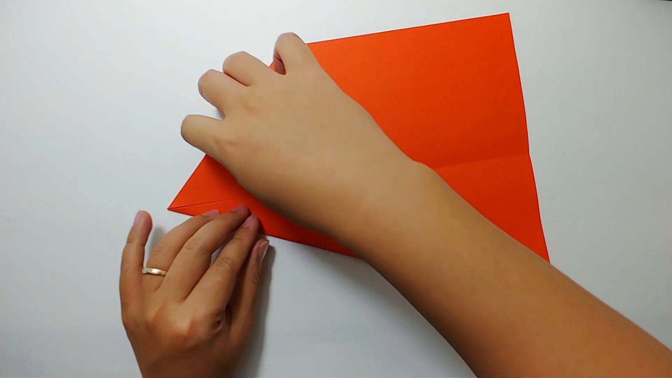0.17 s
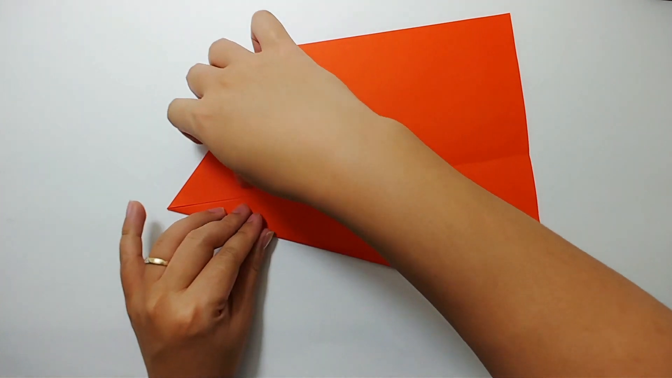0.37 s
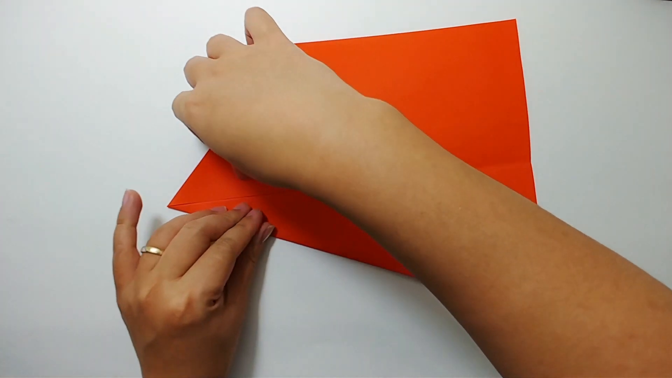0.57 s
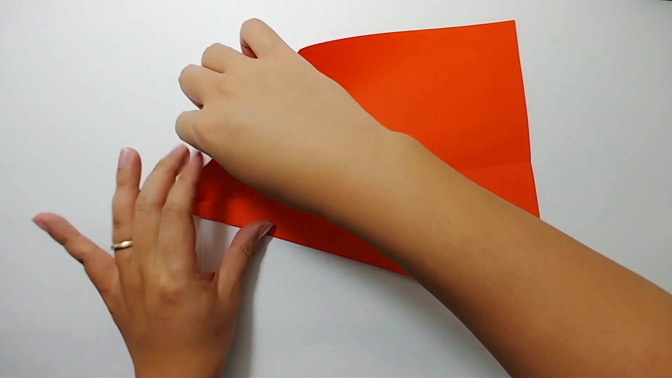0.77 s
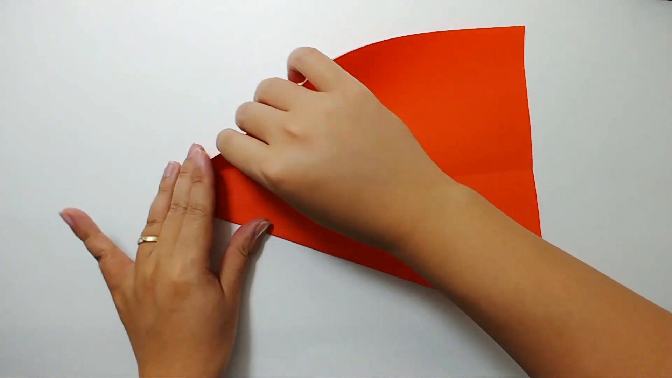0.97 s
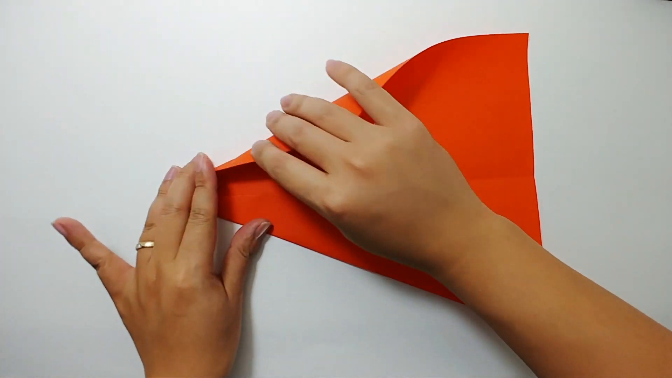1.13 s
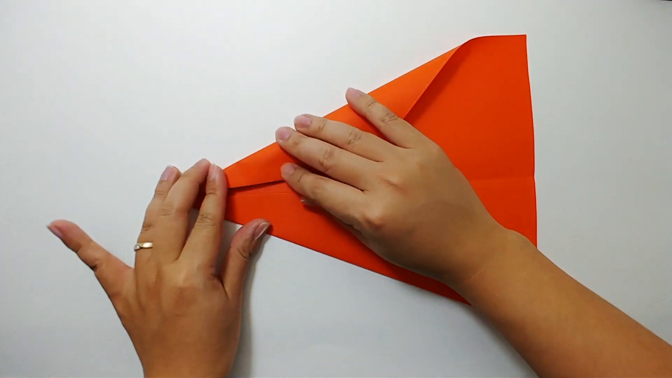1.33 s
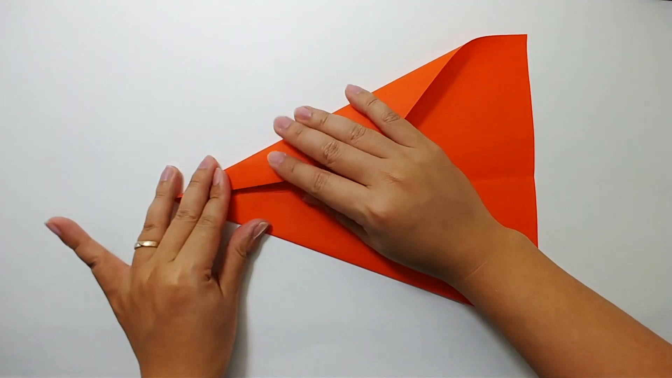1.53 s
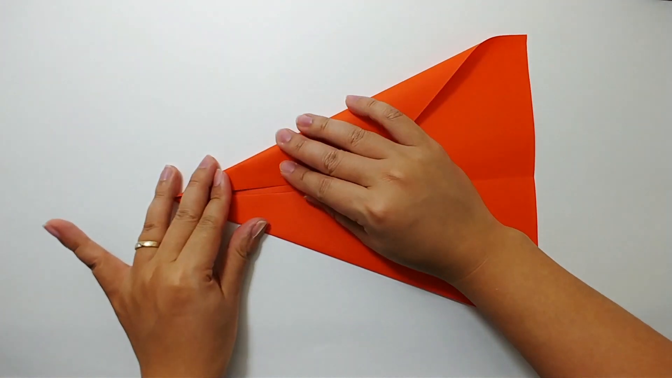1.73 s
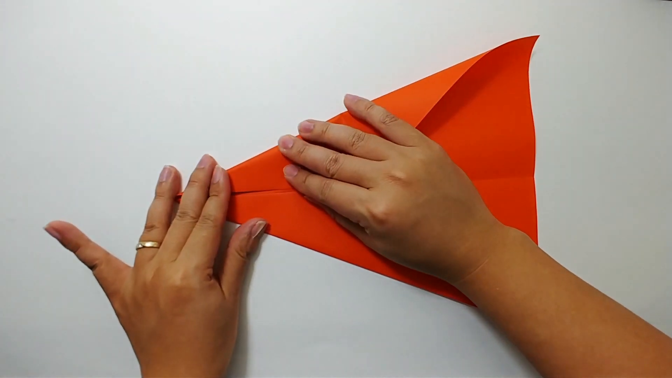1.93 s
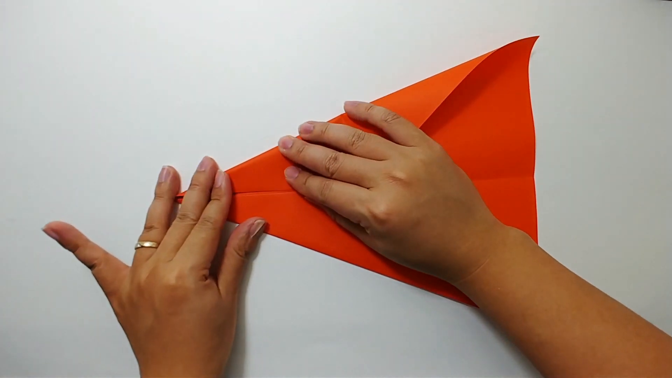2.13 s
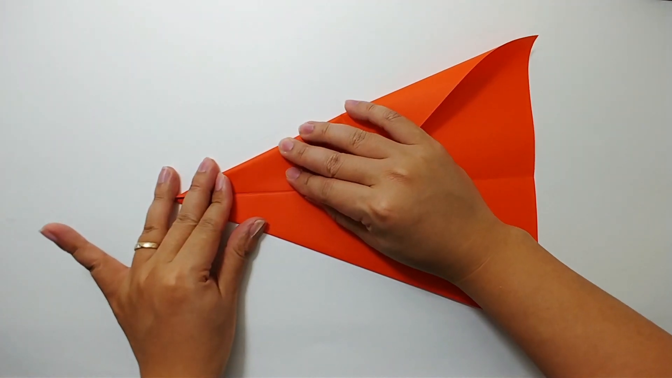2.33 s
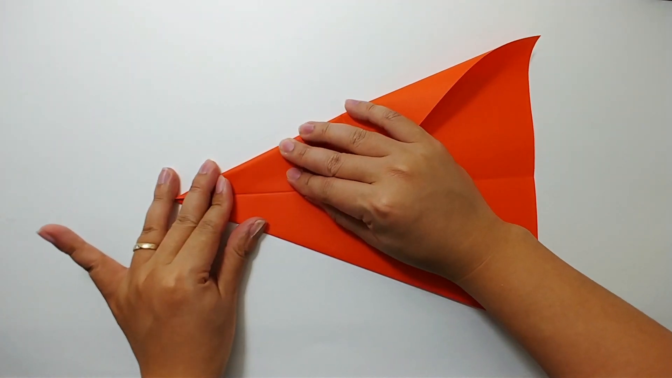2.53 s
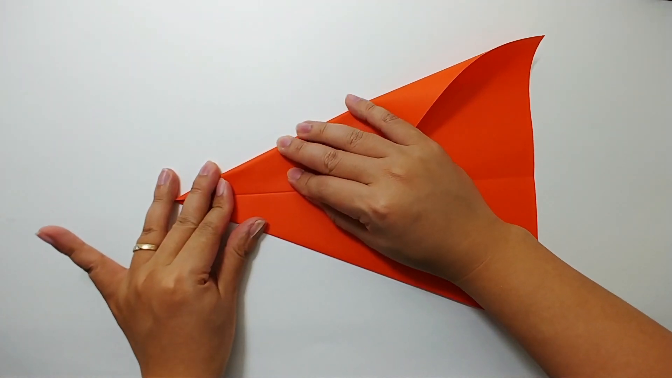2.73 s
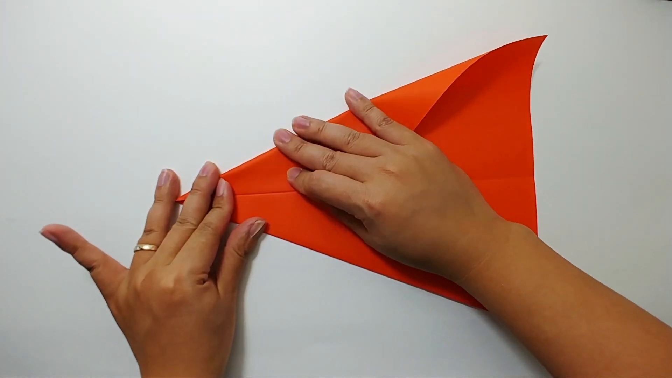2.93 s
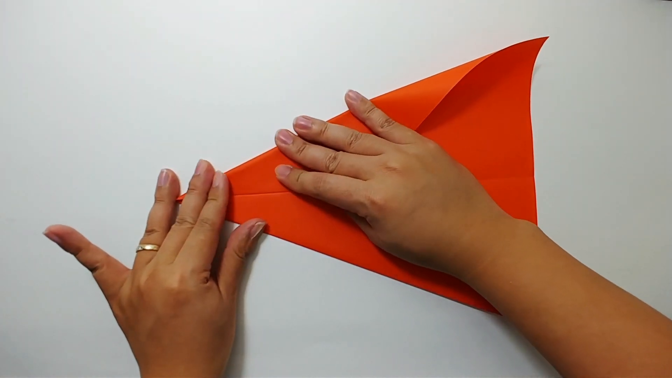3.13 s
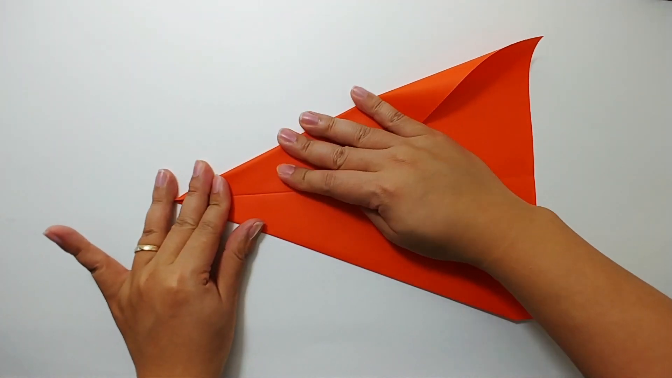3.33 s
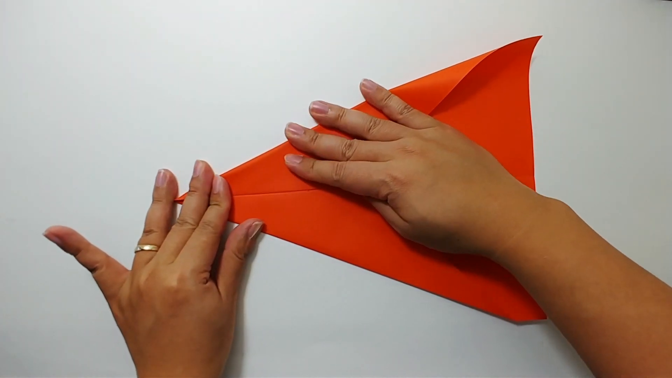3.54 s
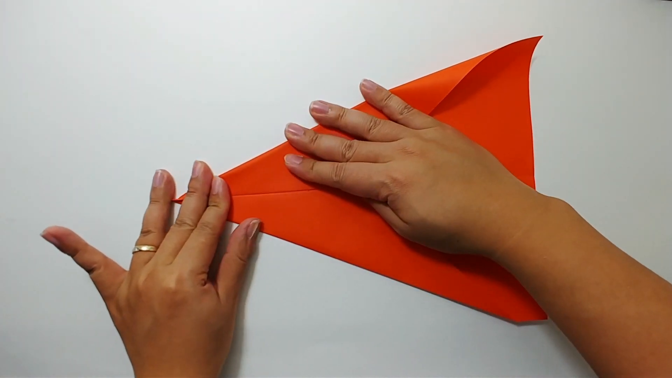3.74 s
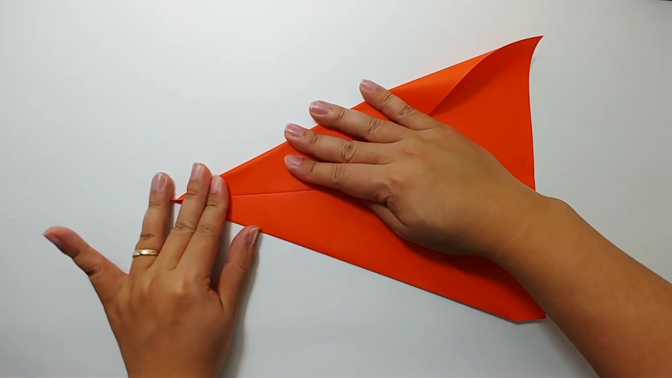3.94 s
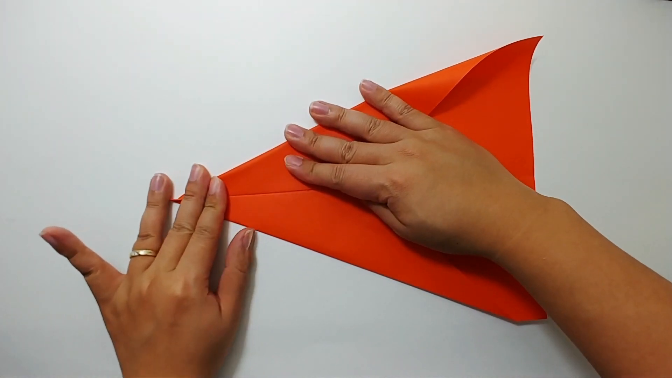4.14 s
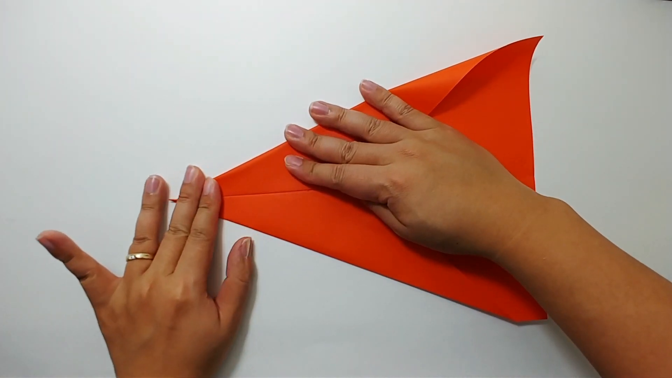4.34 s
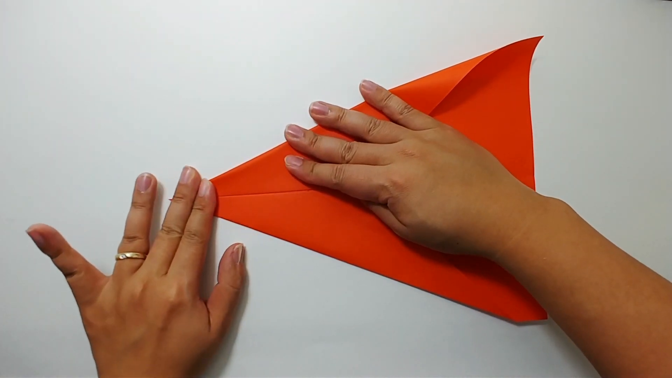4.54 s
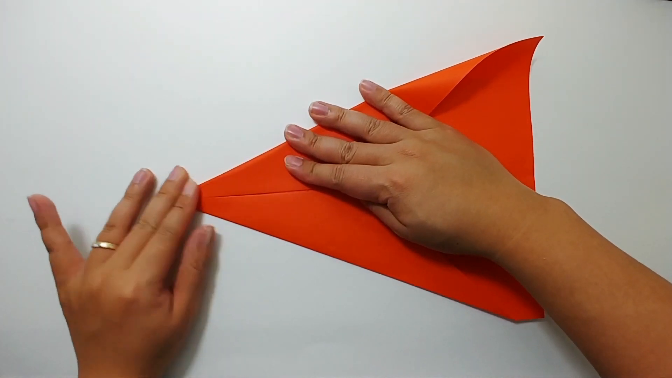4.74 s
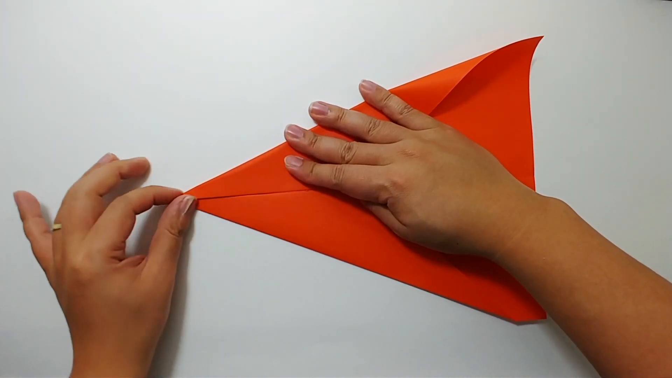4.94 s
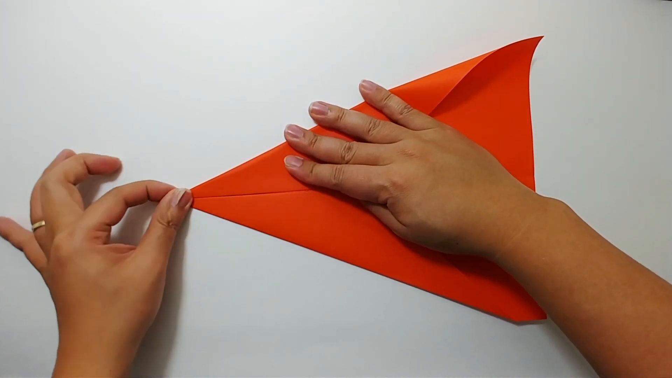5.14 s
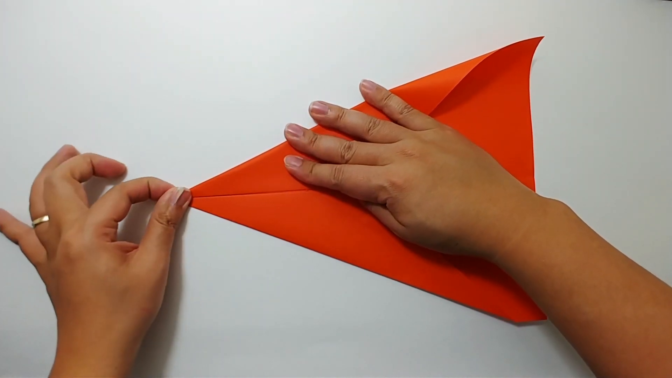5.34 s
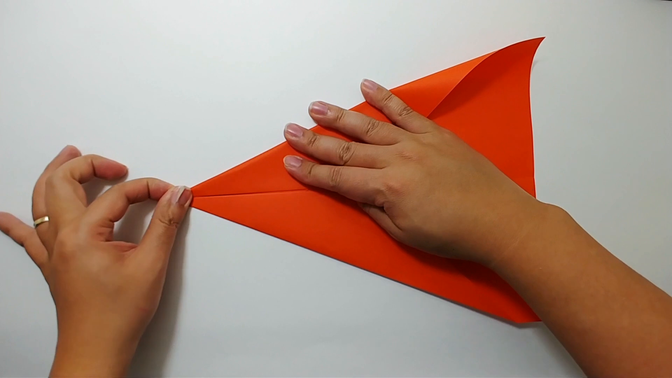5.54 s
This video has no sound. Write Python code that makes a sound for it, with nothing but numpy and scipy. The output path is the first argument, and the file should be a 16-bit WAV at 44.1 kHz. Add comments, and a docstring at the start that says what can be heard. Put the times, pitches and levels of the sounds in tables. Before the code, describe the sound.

Over a steady faint low rumble, paper ticks sharply and slides over itself with a bright swish whose hollow hum drops in pitch. A brief resonant pop follows, then scattered crackles, dry fingertip strokes and dull table bumps. The end is quieter, apart from a short strong stroke and a snap. Close stereo microphone, small dry room.

```python
"""Two hands fold a sheet of paper on a table in a small quiet room, close to a stereo microphone.
Over a steady low rumble, first crinkles, finger strokes and hand bumps lead to sharp ticks of the buckling sheet.
Just before 1 s the flap starts to slide over (filtered noise); the hum of its air pocket drops as it closes.
At 2 s the flap pops (fading sine waves); small crinkles (bursts of clicks) and strokes along the crease follow.
From 3.9 s light finger skids and mostly faint strokes remain, with one strong stroke near 4.9 s and one more
loud crinkle just before 5 s."""
import sys
import numpy as np
from scipy import signal
from scipy.fft import rfft, irfft, next_fast_len
from scipy.io import wavfile
from scipy.ndimage import uniform_filter1d

SR = 44100
rng = np.random.default_rng(int(sys.argv[2]) if len(sys.argv) > 2 else 0)


def to_wav(sig):
    """Store sig (one row per channel, or 1-D mono) as 16-bit WAV at the path in sys.argv[1].

    Samples outside -1..1 are clipped; the rate is SR.
    """
    pcm = np.clip(np.atleast_2d(sig), -1, 1) * 32767
    pcm = np.round(pcm).astype(np.int16)
    wavfile.write(sys.argv[1], SR, pcm.T)  # frames by channels


N = 251229
TIME = np.arange(N) / SR  # s


def undb(db):
    """Turn decibels into a gain."""
    return 10 ** (np.asarray(db) / 20)


def unit(x):
    """Scale to rms 1."""
    return x / np.sqrt(np.mean(x ** 2) + 1e-20)


def colour(x, points, bumps=()):
    """Filter that never sounds early, from (f/Hz, level/dB) points and (f/Hz, width/Hz, lift/dB) resonances."""
    n = 2 * next_fast_len(x.shape[-1] // 2 + 1)
    f = np.arange(n // 2 + 1) * SR / n
    hz, db = np.transpose(points)
    curve_db = np.interp(np.log(f + 1), np.log(hz), db)
    for centre, width, lift in bumps:
        curve_db = curve_db + lift / (1 + (2 * (f - centre) / width) ** 2)
    # folding the cepstrum onto positive times gives the minimum-phase filter
    cepstrum = irfft(np.log(undb(curve_db)))
    cepstrum[1:n // 2] *= 2
    cepstrum[n // 2 + 1:] = 0
    response = np.exp(rfft(cepstrum))
    return irfft(rfft(x, n) * response)[..., :x.shape[-1]]


# the four parts of paper sound; the upper edges of the first three split them: (lower f/Hz, upper f/Hz)
PART_EDGES = [(250, 850), (850, 2000), (2000, 6000), (6300, 11500)]


def bands(x):
    """Split into low scrape, sheet flexing, main rustle and fibre hiss, each at rms 1."""
    n = next_fast_len(x.shape[-1])
    spectrum, f = rfft(x, n), np.arange(n // 2 + 1) * SR / n
    lowpasses = [1 / (1 + (f / upper) ** (10 + upper / 300)) for _, upper in PART_EDGES[:-1]]
    below = [0] + lowpasses + [1]
    parts = [irfft(spectrum * (b - a), n) for a, b in zip(below, below[1:])]
    return [unit(part[..., :x.shape[-1]]) for part in parts]


def stereo(x, left_db):
    """Lean the sound to one side; left_db is how much louder the left gets than the right."""
    return x * undb(np.array([[left_db], [-left_db]]) / 2)


def port_noise(apart_db):
    """Noise that both microphone ports share, with a part that differs between them."""
    mid, side = rng.standard_normal((2, N))
    return mid + undb(apart_db) * side * np.array([[1], [-1]])


def walk(rate):
    """Smooth random wander with spread 1, taking `rate` new values per second."""
    step = int(SR / rate)
    values = np.repeat(rng.standard_normal(N // step + 1), step)[:N]
    return unit(uniform_filter1d(values, step))


def slips(rate, scatter_db, size):
    """Random catches of the paper fibres, `rate` per second: many small ones and a few large."""
    caught = rng.random(size) < rate / SR
    sign = rng.choice([-1, 1], size)
    return caught * sign * undb(scatter_db * np.minimum(rng.exponential(1, size), 4))


def spread(near_t60, direct_db, room_t60=0.12, room_db=-11, lag_size=5, size=8192):
    """How a slip at one spot reaches both ports: direct tick, flutter between sheet and table, short room tail."""
    t = TIME[:size]
    mid, side = rng.standard_normal((2, size))
    paths = mid + colour(side, [(150, -7.5), (1200, 0.5), (2500, 1.0)]) * np.array([[1], [-1]])
    decay = unit(undb(-60 * t / near_t60)) + undb(room_db) * unit(undb(-60 * t / room_t60))
    direct = np.zeros((2, size))
    direct[0, 0] = direct[1, lag_size] = 1  # the left port is a little nearer
    spectrum = rfft(unit(paths * decay) + undb(direct_db) * unit(direct))
    # the paths leave fine ripples only; the broad colour belongs to the paper
    broad = np.sqrt(uniform_filter1d(np.mean(abs(spectrum) ** 2, axis=0), size=100))
    return irfft(spectrum / broad)[:, :size * 3 // 4]


def resonance(hz, width_hz, apart_db):
    """A gliding resonance stirred by friction noise, at rms 1."""
    stir = port_noise(apart_db) + 1j * port_noise(apart_db)
    swell = signal.sosfilt(signal.butter(2, width_hz / 2, fs=SR, output="sos"), stir)
    return unit(np.real(swell * np.exp(2j * np.pi * np.cumsum(hz) / SR)))


def gestures(rows, skew, power, linger_db=-14, linger_s=0.062):
    """Loudness of (start t/s, length t/s, level/dB) movements that speed up and slow down.
    Light contact lingers just before and after. Skew over 1 peaks late; low power is flat-topped."""
    energy = np.zeros(N)
    for start, length, db in rows:
        on = (TIME > start) & (TIME < start + length)
        speed = np.sin(np.pi * ((TIME[on] - start) / length) ** skew)
        energy[on] += (undb(db) * abs(speed) ** power) ** 2
    span = int(linger_s * SR) + 1
    contact = abs(uniform_filter1d(uniform_filter1d(energy, span), span))
    return np.sqrt(energy + undb(linger_db) ** 2 * contact)


def held(starts, values):
    """Each movement keeps its own value until the next one starts."""
    return values[np.maximum(np.searchsorted(starts, TIME) - 1, 0)]


# colour of the room rumble and hiss: (f/Hz, relative level/dB per Hz)
ROOM_COLOUR = [(20, -10.5), (40, -9.5), (65, 1), (100, -3), (135, 0), (190, -15.5), (270, -31.5),
               (380, -15.5), (600, -21.5), (1000, -24.5), (2000, -32.5), (5300, -43), (6400, -51.5),
               (11500, -51)]
# faint resonances in the room noise: (f/Hz, width/Hz, lift/dB)
ROOM_RESONANCES = [(109, 16, 3.5), (373, 22, 6), (600, 36, 7.5), (834, 30, 11), (970, 36, 6.5)]
ROOM_DB = -57


def room():
    """Steady rumble, more alike at both ports in the bass and diffuse higher up."""
    mid, side = rng.standard_normal((2, N))
    side = colour(side, [(30, -3.5), (100, -8), (400, -7.5), (2000, 1)])
    noise = colour(mid + side * np.array([[1], [-1]]), ROOM_COLOUR, ROOM_RESONANCES)
    return stereo(unit(noise) * undb(ROOM_DB), left_db=0.0)


# low tones at which the tabletop rings: (f/Hz, width/Hz, relative level/dB)
TABLE_MODES = [(74.5, 6.1, 8), (121.2, 11, 8.5), (134.8, 8.3, -1.5), (180, 10, -34)]
# a hand leans its weight on the table: (start t/s, length t/s, level/dB)
HAND_LEANS = [(.72, 0.15, -49), (.96, 0.11, -54), (1.47, 0.29, -48.5), (2.47, .22, -52), (3.22, .12, -49),
              (5.49, 0.2, -49.5)]
# table tremor of resting hands (dB) and of a finger stroke (dB re the stroke)
REST_TREMOR_DB, STROKE_TREMOR_DB = -62, -5


def tabletop(effort, wander_db=2, lean_power=0.47):
    """Tremors of resting, leaning and stroking hands ring the table's low modes."""
    rest = undb(REST_TREMOR_DB + wander_db * walk(rate=5.4))
    lean = gestures(HAND_LEANS, 0.83, lean_power)
    stroke = undb(STROKE_TREMOR_DB) * effort
    force = np.sqrt(rest ** 2 + lean ** 2 + stroke ** 2)
    low_band = signal.butter(2, [45, 240], "band", fs=SR, output="sos")
    tremor = signal.sosfilt(low_band, port_noise(apart_db=-6))
    ring = 0
    for hz, width, db in TABLE_MODES:
        ring = ring + undb(db) * signal.lfilter(*signal.iirpeak(hz, hz / width, fs=SR), tremor)
    return stereo(unit(ring) * force, left_db=-2.5)


# a hand lands or shifts on the table: (t/s, peak level/dB before the lean to one side, starting f/Hz, rise t/s)
HAND_THUMPS = [(0.328, -38.5, 208, 0.0018), (.331, -27, 102.4, .007), (0.74, -42, 136, 0.0057),
               (1.491, -40, 73.5, 0.013), (1.56, -39, 127, 0.0045), (2.021, -38, 161, 0.002),
               (2.774, -44, 79, 0.01), (2.908, -45.5, 85, 0.014), (3.577, -40, 126, 0.012),
               (3.776, -35, 95.4, 0.007), (3.969, -38.5, 112.5, 0.0087), (4.002, -37.5, 108, .006),
               (4.448, -33, 136, 0.0043), (5.351, -41, 108.3, 0.012)]


def thumps(sag=0.18, sag_s=0.056, size=8192):
    """A soft push bends the table for a few cycles; the pitch sags as the hand settles."""
    out, t = np.zeros(N + size), TIME[:size]
    for s, db, hz, rise in HAND_THUMPS:
        pitch = hz * (1 - sag * (1 - np.exp(-t / sag_s)))
        phase = np.cumsum(pitch) / SR
        swell = t / rise * np.exp(1 - t / rise)
        start = int(s * SR)
        out[start:start + size] += undb(db) * swell * np.sin(2 * np.pi * phase)
    return stereo(out[:N], left_db=-6)


# colour of the rubbed sheet, also used for the crinkles: (f/Hz, level/dB)
PAPER_COLOUR = [(100, -35.5), (250, -11.5), (400, -0.5), (800, -3.5), (1100, -4), (1400, -4.5), (2600, -1),
                (4100, 0), (5400, 0.5), (5900, -7), (6450, -17), (8000, -12), (9700, -19.5), (12000, -35.5)]
# resonances of the sheet on the table: (f/Hz, width/Hz, lift/dB)
SHEET_RESONANCES = [(1349, 200, 10), (1930, 110, 7.5), (2656, 720, 3.5), (3700, 210, 8), (4535, 420, 3),
                    (5300, 260, 4.5)]


def friction(wander_db=1.5, grip_db=1.0, count=2):
    """Dense stick-slip catches drive the sheet at fingertips whose shares wander; gives four parts and the grip."""
    grip, sound = undb(grip_db * walk(rate=110)), 0
    for _ in range(count):
        share = undb(wander_db * walk(rate=7.6))
        drive = slips(rate=3000, scatter_db=3.5, size=N) * grip * share
        sound = sound + signal.fftconvolve(drive[None], spread(near_t60=0.049, direct_db=-15.5))[:, :N]
    # the fingertips share one total force, so the level is evened out
    sound = sound / np.sqrt(uniform_filter1d(np.mean(sound ** 2, axis=0), size=2200) + 1e-12)
    scrape, flex, rustle, hiss = bands(colour(sound, PAPER_COLOUR, SHEET_RESONANCES))
    return scrape, flex, rustle, hiss, grip


REST_RUB_DB = -82.5  # level of the rustle before its wander


def resting_hands(rub, wander_db=3, flex_db=-3, hiss_db=-10):
    """The hands that hold the sheet down never keep quite still and rub it very faintly."""
    _, flex, rustle, hiss, _ = rub
    level = undb(REST_RUB_DB + wander_db * walk(rate=6))
    return level * (undb(flex_db) * flex + rustle + undb(hiss_db) * hiss)


# dry fingertips skid lightly over the sheet: (start t/s, length t/s, level/dB before the mix, swish f/Hz)
FINGER_SKIDS = [(.34, 0.18, -67, 5300), (0.421, .05, -56.5, 5250), (.485, 0.14, -58, 4440),
                (3.852, 0.04, -60, 4780), (3.953, 0.22, -64.5, 4960), (4.441, 0.13, -54, 4740),
                (4.923, .15, -51.5, 5240), (5.107, 0.05, -66, 3190), (5.143, 0.063, -56.5, 5170),
                (5.231, 0.042, -57.5, 4270)]


def finger_skids(rub, skew=0.6, power=0.54, rustle_db=-3.5, swish_db=-3.0, flex_db=-17, hiss_db=-19):
    """A light touch starts quickly and trails off in a bright, narrow swish."""
    _, flex, rustle, hiss, grip = rub
    start, length, db, hz = np.transpose(FINGER_SKIDS)
    swish = grip * resonance(held(start, hz), width_hz=550, apart_db=-1.5)
    paper = undb(flex_db) * flex + undb(rustle_db) * rustle + undb(swish_db) * swish + undb(hiss_db) * hiss
    return stereo(gestures(zip(start, length, db), skew, power) * paper, left_db=1.2)


# the flap slides over the sheet in pushes:
# (start t/s, length t/s, level/dB, flexing level/dB re level, air pocket level/dB re level)
FLAP_PUSHES = [(0.898, 0.14, -38, -17, -11.5), (1.019, 0.14, -38, -16.5, -8.5),
               (1.085, .16, -38.5, -15.5, -10.5), (1.152, 0.29, -40.5, -12, -12),
               (1.418, 0.17, -48, -2.5, -5.5), (1.6, 0.086, -44.5, -2, -20), (1.728, 0.066, -53.5, 6, -14),
               (1.782, 0.064, -51, 6, -10), (1.806, 0.16, -60.5, 6, 7.5), (1.852, 0.2, -52, -10, -16),
               (2.169, 0.086, -67, -12, 0)]
# the flap closes: middle and time scale (s); the air pocket under it sinks from open to closed pitch (Hz)
CLOSE_S, CLOSE_TIME_S, POCKET_OPEN_HZ, POCKET_CLOSED_HZ = 1.19, 0.0256, 2090, 1425


def flap_slides(rub, skew=0.97, power=1.15, low_db=-28, hiss_db=-17, swish_hz=3300, swish_drift=0.13,
                swish_db=-9):
    """Paper slides on paper with a wandering swish; the air pocket hums lower as the flap closes."""
    scrape, flex, rustle, hiss, grip = rub
    start, length, db, flex_db, pocket_db = np.transpose(FLAP_PUSHES)

    def push(extra_db):
        """Loudness of the pushes, raised by extra_db."""
        return gestures(zip(start, length, db + extra_db), skew, power)

    closed = (1 + np.tanh((TIME - CLOSE_S) / CLOSE_TIME_S)) / 2  # 0 open, 1 closed
    pocket_hz = POCKET_OPEN_HZ + (POCKET_CLOSED_HZ - POCKET_OPEN_HZ) * closed
    pocket = resonance(pocket_hz, width_hz=400, apart_db=-2.5)
    wandering_hz = swish_hz * np.exp(swish_drift * walk(rate=10))
    swish = grip * resonance(wandering_hz, width_hz=310, apart_db=9)
    paper = undb(low_db) * scrape + rustle + undb(swish_db) * swish + undb(hiss_db) * hiss
    return stereo(push(0) * paper + push(flex_db) * flex + push(pocket_db) * pocket, left_db=-1.0)


# fingers press along the crease: (start t/s, length t/s, level/dB before the mix, ring under the finger f/Hz)
CREASE_STROKES = [(0.226, 0.21, -57.5, 3400), (.39, 0.36, -62.5, 3600), (0.727, 0.22, -50, 3600),
                  (1.408, 0.17, -45.5, 3700), (1.488, 0.24, -51, 2700), (1.732, 0.11, -48, 2800),
                  (1.853, 0.13, -45, 3750), (2.647, 0.62, -62.5, 2790), (2.838, 0.16, -46.5, 2650),
                  (2.92, 0.056, -45, 4700), (3.118, 0.085, -49.5, 3200), (3.131, 0.42, -60, 3150),
                  (3.278, 0.38, -56, 2750), (3.37, 0.23, -43, 2680), (3.575, 0.14, -52.5, 2900),
                  (4.565, 0.14, -76, 4800), (4.662, 0.32, -65, 5000), (4.831, 0.11, -46.5, 4600),
                  (4.96, 0.33, -71.5, 2700), (5.289, 0.47, -73.5, 4500)]


def finger_strokes(rub, effort, low_db=-11.5, flex_db=-15, rustle_db=-1.0, hiss_db=-11, fizz_db=-14,
                   ring_db=-6):
    """Skin pressed along the fold scrapes, rings the sheet under it and hisses high on the fibres."""
    scrape, flex, rustle, hiss, grip = rub
    start, _, _, hz = np.transpose(CREASE_STROKES)
    fizz = unit(colour(port_noise(apart_db=-5.5), [(6500, 1.0), (9500, 1), (11500, -1.5), (13000, -19)]))
    fizz = fizz * effort / effort.max()  # stronger strokes are brighter
    ring = resonance(held(start, hz), width_hz=500, apart_db=-1.5)
    paper = undb(low_db) * scrape + undb(flex_db) * flex + undb(rustle_db) * rustle + undb(hiss_db) * hiss
    return stereo(effort * (paper + grip * (undb(fizz_db) * fizz + undb(ring_db) * ring)), left_db=0.5)


# the sheet buckles or is tapped: (t/s, length t/s, level/dB, low scrape level/dB re level,
# flexing level/dB re level, ring of the buckling patch f/Hz)
BUCKLES = [(.062, .02, -70, 9, 2, 2400), (.2485, .006, -58.5, -12, -6, 5200),
           (.3035, .012, -47, 2, 4, 4730), (.3265, .004, -37, -9, -14, 4740),
           (.8131, .002, -28.8, -23, -20, 4600), (.8265, .006, -35, -12, -9, 4640),
           (.836, .022, -33, -15, -11, 4610), (1.327, .008, -36, -26, -10, 5250),
           (1.604, .01, -43, -18, -9, 4700), (1.63, .006, -41, -22, -3, 2720),
           (1.7155, .006, -50, -16, -7, 3600), (1.7595, .003, -50, -11, -2, 2770),
           (2.0053, .005, -47, -5, -2, 3180), (2.0208, .007, -29.5, -18, 0, 2050),
           (2.198, .012, -58.5, -14, -4, 4000), (2.248, .012, -64, -14, -10, 4000),
           (2.2765, .007, -62, -12, -10, 5260), (2.3215, .006, -59, -18, -10, 3370),
           (2.3555, .007, -56, -19, -15, 4800), (2.4085, .011, -57, -16, -9, 2580),
           (2.4725, .011, -47, -12, -7, 2480), (2.535, .018, -57, -16, -13, 2900),
           (2.599, .008, -57, -19, -14, 3530), (2.632, .013, -53, -18, -13, 2860),
           (2.692, .008, -62, -4, -10, 2790), (2.711, .012, -57, -18, -14, 2750),
           (2.7616, .007, -61, -16, -8, 3320), (2.7861, .008, -56, -12, -14, 2850),
           (3.193, .016, -44, -20, -9, 2750), (3.611, .008, -52, -16, -14, 4500),
           (3.7145, .008, -49.5, -15, -19, 3820), (3.779, .008, -66, -4, -4, 3690),
           (4.447, .01, -54, -8, -8, 4800), (4.959, .004, -29.5, -19, -11.5, 2950),
           (5.376, .007, -61.5, -14, -10, 2340), (5.434, .005, -52.5, -20, -13, 5160),
           (5.639, .006, -52, -19, -8, 2660)]
# fibre hiss of a crinkle that rings at CRINKLE_HZ (dB re its level); smaller, higher patches hiss more
CRINKLE_HISS_DB, CRINKLE_HZ, HISS_DB_PER_OCTAVE = -16, 3600, 2


def crinkles(ring_width_hz=800, ring_db=10.0, break_share=0.58, size=8192, lead_size=256):
    """Each buckle is a sharp break and a quick run of smaller ones, ringing its own patch of the sheet."""
    out, t = np.zeros((2, N + size)), TIME[:size]
    for s, length, level_db, low_db, flex_db, ring_hz in BUCKLES:
        run = slips(rate=3300, scatter_db=0.5, size=size) / (1 + (t / length) ** 8)
        first_break = 1. * (t == 0)
        # a short silent lead leaves room for the band filters, which spread both ways in time
        drive = np.pad(unit(run) + break_share * unit(first_break), (lead_size, 0))
        path = spread(near_t60=0.052, direct_db=-7.5, room_db=-13)
        sound = signal.fftconvolve(drive[None], path)[:, :size]
        sound = colour(sound, PAPER_COLOUR, [(ring_hz, ring_width_hz, ring_db)])
        hiss_db = CRINKLE_HISS_DB + HISS_DB_PER_OCTAVE * np.log2(ring_hz / CRINKLE_HZ)
        part_db = (low_db, flex_db, 0, hiss_db)
        sound = sum(part * undb(level_db + db) for part, db in zip(bands(sound), part_db))
        start = int(s * SR) - lead_size
        out[:, start:start + size] += sound * np.sqrt(.02 * SR / size)  # levels are rms over 20 ms
    return stereo(out[:, :N], left_db=-1.5)


# tones of the popping flap: (f/Hz, level/dB re POP_DB, 60 dB decay t/s before ring_scale shortens it)
FLAP_MODES = [(999, -9.5, 0.15), (1125, 3, 0.043), (1264, -2.5, 0.11), (1467, 2.5, .08),
              (1770, -18.5, 0.099), (2776, -4.5, 0.086), (2900, -32.5, 0.13), (3190, -7.5, 0.08),
              (3600, -12, .06)]
# the bulging flap pops through: time (s), level (dB)
POP_S, POP_DB = 2.0212, -23


def pop(rise_s=.002, ring_scale=0.59, port_lag=0.091):
    """The flap snaps through and rings briefly; the two ports hear its modes a little out of phase."""
    t = np.maximum(TIME - POP_S, 0)
    modes = 0
    for hz, db, t60 in FLAP_MODES:
        phase = rng.random() + port_lag * rng.standard_normal((2, 1)) / 2  # in cycles
        fade_db = -60 * np.minimum(t / (ring_scale * t60), 4)
        modes = modes + undb(db + fade_db) * np.sin(2 * np.pi * (hz * t + phase))
    return undb(POP_DB) * (1 - np.exp(-t / rise_s)) * modes


def scene():
    """Room, table and paper together; the effort of the strokes both rubs the sheet and shakes the table."""
    rub = friction()
    effort = gestures([row[:3] for row in CREASE_STROKES], skew=0.98, power=2.03)
    background = room() + tabletop(effort) + thumps()
    rubbing = resting_hands(rub) + finger_skids(rub) + flap_slides(rub) + finger_strokes(rub, effort)
    return background + rubbing + crinkles() + pop()


TOP_HZ = 12100


def record(dry):
    """The recorder cuts steeply above TOP_HZ."""
    return signal.sosfilt(signal.ellip(8, .2, 70, TOP_HZ, fs=SR, output="sos"), dry)


dry = scene()
out = record(dry)
to_wav(out)
```